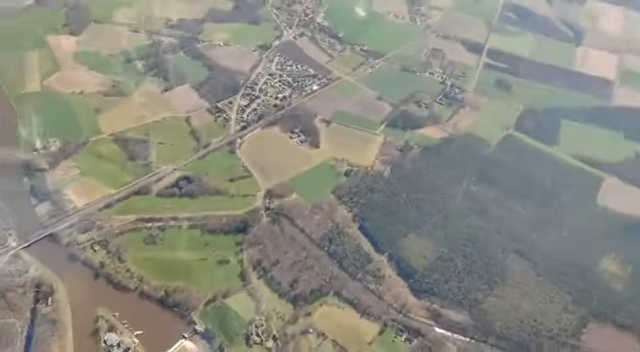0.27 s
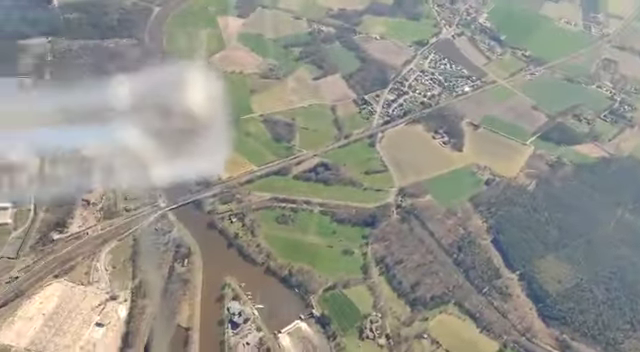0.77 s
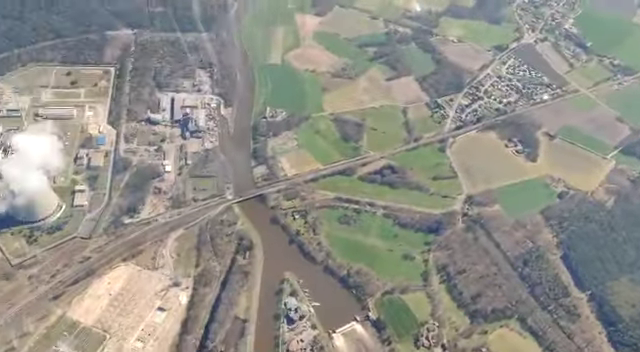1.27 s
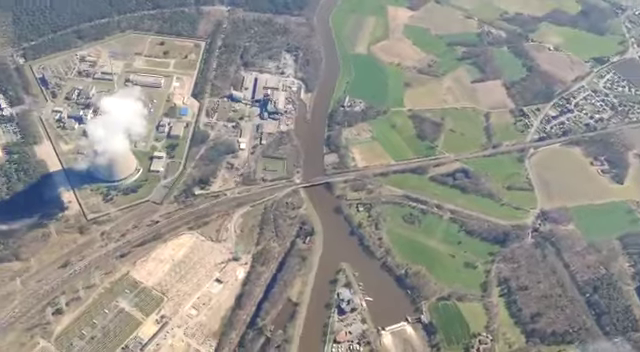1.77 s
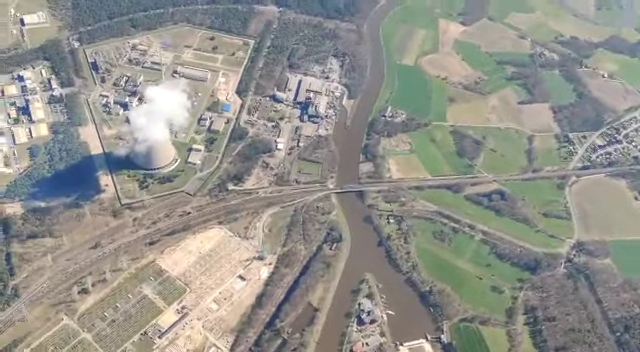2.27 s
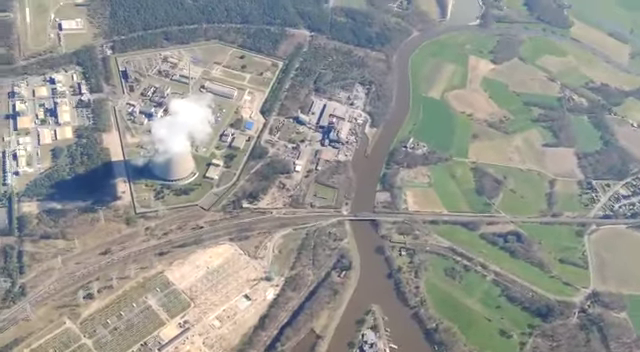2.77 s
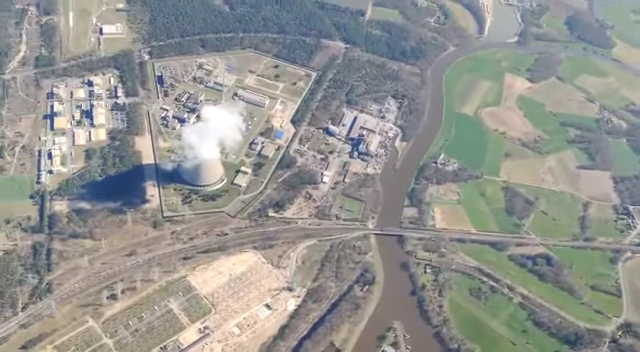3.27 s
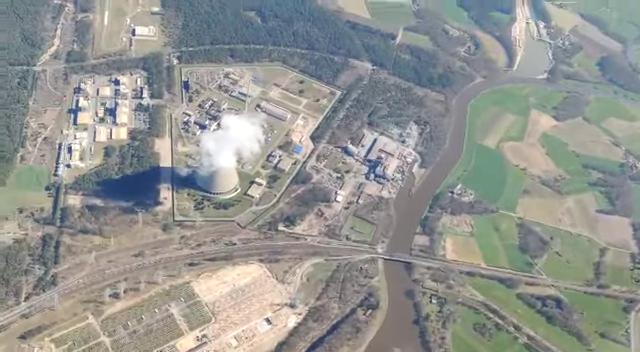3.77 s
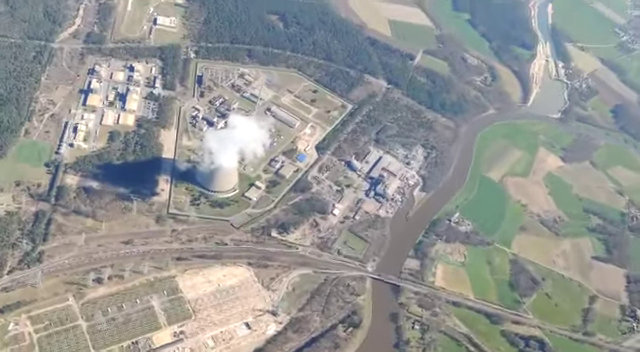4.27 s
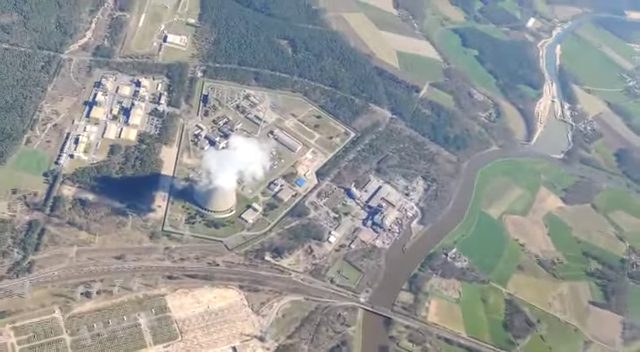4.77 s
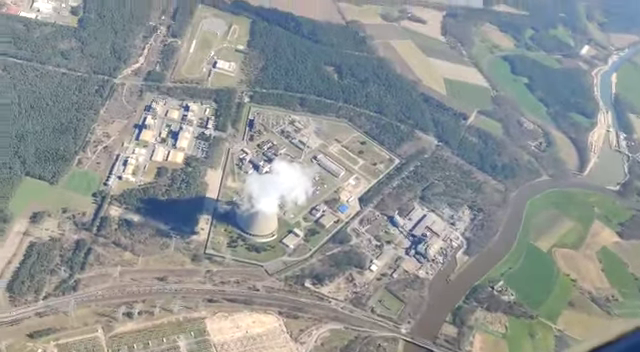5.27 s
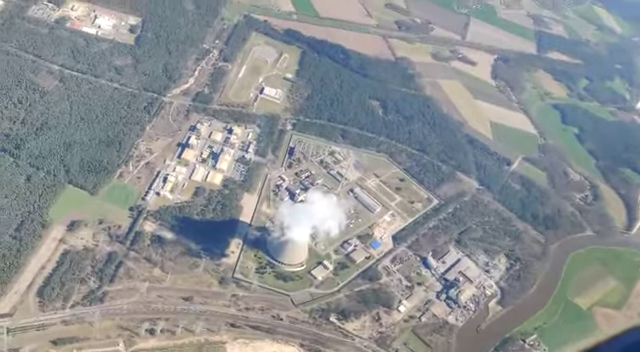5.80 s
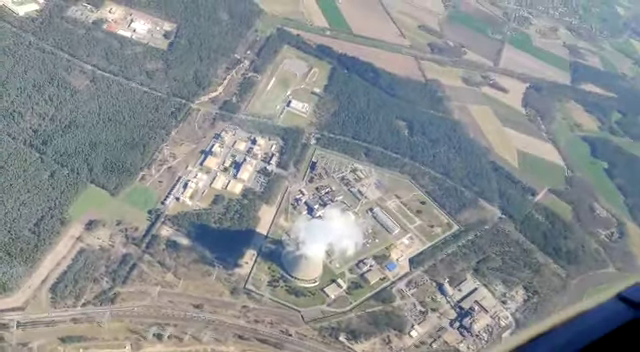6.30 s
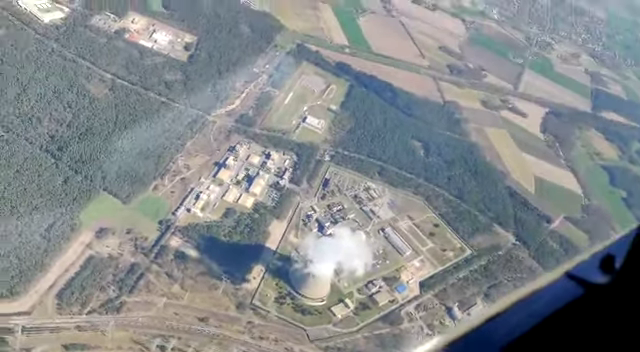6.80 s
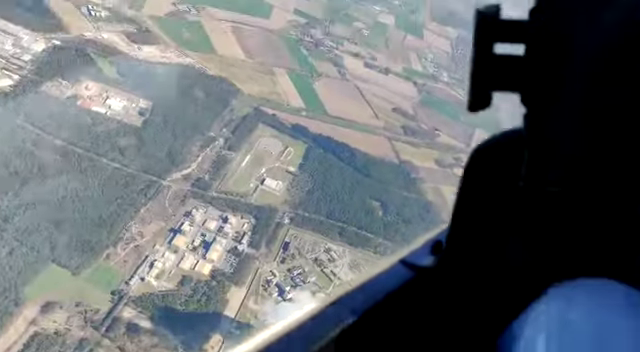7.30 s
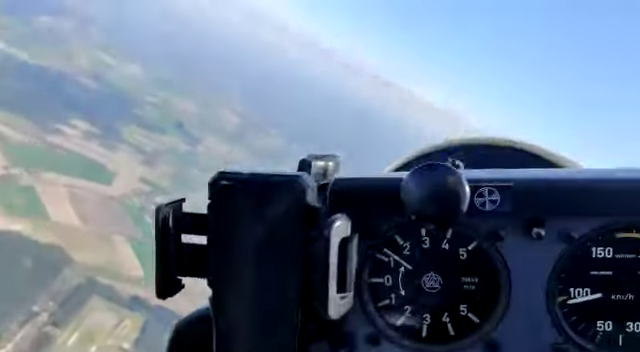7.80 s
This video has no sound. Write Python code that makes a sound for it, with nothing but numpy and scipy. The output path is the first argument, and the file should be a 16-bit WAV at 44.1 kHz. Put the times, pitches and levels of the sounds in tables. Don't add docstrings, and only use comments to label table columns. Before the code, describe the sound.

Inside the closed cockpit of a sailplane in flight, deep air roar fills the cabin without a break. Low boom and shell shudder flutter irregularly, with duller drumming and a soft wide hiss from the canopy and vent. The shudder is roughest near the third second, the hiss peaks soon after, then jolts crowd the second half and a last gust swells at the end. A handheld stereo microphone is close to overload, its limiter squeezing the bass.

```python
import sys
import numpy as np
from scipy import signal
from scipy.fft import rfft, irfft
from scipy.io import wavfile
from scipy.ndimage import uniform_filter1d

SR = 44100
rng = np.random.default_rng(int(sys.argv[2]) if len(sys.argv) > 2 else 0)


def persist_wave(psi):
    counts = np.round(np.clip(psi, -1, 1) * 32767).astype(np.int16)
    wavfile.write(sys.argv[1], SR, np.atleast_2d(counts).T)


def volts(x):
    e = np.asarray(x, float) / 20
    return 10 ** e


N = 355005
SECONDS = np.arange(N) / SR

BOOM_FROM_HZ, CANOPY_FROM_HZ, VENT_FROM_HZ = 80, 280, 850


def rms_one(x):
    return x / np.sqrt(np.mean(np.abs(x) ** 2) + 1e-20)


def in_time(rows):
    s, *columns = np.transpose(rows)
    return [np.interp(SECONDS, s, column) for column in columns]


def drift(rate):
    r = np.exp(-80 * np.pi * rate / SR)
    noise = rng.standard_normal(N // 40 + 2002)
    slow = signal.lfilter([1], [1, -2 * r, r * r], noise)[2000:]
    return np.interp(np.arange(N) / 40, np.arange(len(slow)), rms_one(slow))


def swells(rows, width_s):
    s, *columns = np.transpose(rows)
    t = np.arange(0, N + 64, 64) / SR
    bells = np.exp(-.5 * ((t - s[:, None]) / width_s) ** 2)
    return [np.interp(SECONDS, t, column @ bells) for column in columns]


# time in seconds, flow over the canopy as hiss in dB, sideslip as drumming in dB.
AIRSTREAM = [(0.0, -40.5, -26.5), (0.36, -41.5, -26), (0.61, -41.5, -24.5), (1.19, -39.5, -24.5),
             (2.96, -40.5, -30), (3.38, -38.5, -29), (3.54, -36.5, -30.5), (3.79, -37, -35),
             (4.37, -42, -31.5), (5.25, -39.5, -26), (5.63, -39, -28), (6.08, -38.5, -25.5),
             (6.61, -40, -28), (6.77, -40, -29.5), (7.73, -40.5, -31), (8.05, -43.5, -33)]
# time in seconds, shudder of the shell in dB.
ROUGH_AIR = [
    (0.0, -21),
    (1.66, -24),
    (2.53, -15),
    (3.36, -19),
    (3.59, -18.5),
    (5.43, -19),
    (5.81, -19.5),
    (6.28, -16.5),
    (8.05, -20.5),
]
# centre in seconds, hiss in dB, drumming in dB.
BRIEF_RISES = [(0.299, 3.5, 2), (0.369, -2.9, -2.5), (0.928, -1.5, -1), (1.107, 1.3, 2.5), (1.242, 3.5, 2.6),
               (2.05, -1.5, -2.5), (2.16, 1, 4.8), (3.307, -2, -4), (3.542, 0.5, 3), (3.956, 2, 5.5),
               (4.146, 2, 4), (4.375, -1.5, -1), (4.629, 1, 4), (4.734, 1, 3.4), (5.029, 1, 2), (5.283, 1.5, 2),
               (5.567, -3, -3), (5.657, 0.9, 3.5), (5.757, -2.5, -4), (6.091, 0.5, 4), (6.226, -3.5, -4.5),
               (6.43, 3, 6.5), (6.765, -4, -4.1), (6.924, -2, -1.5), (7.174, 3, 4.5), (7.593, -0.5, -1),
               (7.807, 5, 2.5), (7.937, 6, 8.5)]
# centre in seconds, boom in dB.
SURGES = [(0.509, -2.5), (1.048, 2.5), (1.182, -3.5), (1.691, -7.5), (1.746, 3), (1.891, 2.5), (2.035, 3),
          (2.1, -2.5), (2.305, -5), (2.405, -8), (2.908, -3), (3.198, 0.5), (3.422, -5.5), (3.557, 6),
          (3.657, 4), (3.781, -4), (3.941, -5.5), (4.096, -6), (5.907, -7), (6.161, -3), (6.351, -4.5),
          (6.52, -0.5), (7.628, -2), (7.722, -7.5)]
# centre in seconds, shudder in dB.
JOLTS = [(1.287, 6), (1.447, -2.5), (1.591, 9.5), (1.716, -2), (2.095, -1), (2.385, -1.5), (4.2, 4),
         (4.744, -6), (5.238, 3.5), (5.378, -4), (5.512, 6.5), (5.612, -8.5), (5.682, 6.5), (5.777, -9),
         (5.981, -7.5), (6.271, 6.5), (6.934, -6.5), (7.144, -3)]
MEAN_FLOW_DB, MEAN_SLIP_DB = -40, -29


def airstream():
    flow_db, slip_db = in_time(AIRSTREAM)
    brief_hiss_db, thud_db = swells(BRIEF_RISES, width_s=0.032)
    shudder_db = in_time(ROUGH_AIR)[0] + swells(JOLTS, width_s=0.041)[0]
    boom_db = 4.5 + 0.43 * SECONDS - 0.69 * (flow_db - MEAN_FLOW_DB)
    boom_db += swells(SURGES, width_s=0.021)[0]
    return shudder_db, boom_db, slip_db + thud_db, flow_db, flow_db + brief_hiss_db


# frequency in Hz, density in dB per Hz.
HISS_LEFT = [(250, -4.5), (500, 2), (800, 4), (1200, 0), (1750, 1.5), (2500, -4), (4200, -2.5),
             (4750, -0.5), (5200, -9.5), (5900, -15), (8000, -21), (11000, -24.5), (14100, -29.5),
             (15300, -51)]
# frequency in Hz, density in dB per Hz.
HISS_RIGHT = [(250, 2), (500, 1.5), (1000, -1.5), (1700, -1), (2500, -6.5), (3300, -3.5), (4300, -8.5),
              (5500, -7.5), (7500, -14.5), (9000, -18), (11200, -23.5), (13500, -22), (15800, -21.5)]


def hiss():
    *_, flow_db, level_db = airstream()
    shared_part, lag = .22, 18
    own, shared = rng.standard_normal((2, N)), rng.standard_normal(N)
    both_ports = np.array([shared, np.roll(shared, lag)])
    white = np.sqrt(1 - shared_part) * own + np.sqrt(shared_part) * both_ports

    log_hz = np.log(np.arange(N // 2 + 1) * SR / N + 1)
    colour_db = []
    for rows in (HISS_LEFT, HISS_RIGHT):
        hz, db = np.transpose(rows)
        colour_db.append(np.interp(log_hz, np.log(hz), db, left=-60))
    body = rms_one(irfft(rfft(white) * volts(np.array(colour_db)), N))

    fine = signal.sosfiltfilt(signal.butter(2, 8000, "high", fs=SR, output="sos"), body)
    fine_db = 0.85 - 0.22 * SECONDS + .3 * (flow_db - MEAN_FLOW_DB) + .7 * drift(4.6)
    flutter_db = 1.02 * drift(22.0)
    return volts(level_db + 5.5 + flutter_db) * (body + (volts(fine_db) - 1) * fine)


# frequency in Hz, width
# in Hz, level in dB rms, left-right difference in dB, left lead in radians.
COCKPIT_MODES = [(28, 28, -20.5, -1.6, .06), (50, 12, -22.5, -3.2, .11), (71, 14, -26.5, -4, .4),
                 (87, 16, -25, 2.5, .3), (102, 18, -19.5, 1.5, .14), (118, 16, -20, 0, .15),
                 (133, 12, -14.5, -1.5, .2), (150, 14, -19, -2.3, .46), (169, 20, -18.5, -2.7, .55),
                 (200, 26, -23, .8, 1.1), (228, 22, -24, 4, .85), (262, 15, -35, -2.7, .2),
                 (295, 30, -35, -2, 1.), (325, 26, -35.5, -.5, 1.8), (372, 24, -35, 10, 1.5),
                (398, 24, -35, 2, .6), (440, 30, -40.5, 9, 2.), (476, 35, -35, 4.6, .3),
                (545, 55, -38, -1, .3), (620, 70, -41, 2, -1.1), (710, 80, -41, 5, .2),
                (765, 50, -48, 0, 0), (890, 130, -44.5, 0, 2.9), (1130, 140, -45, 3.6, 3.05),
                (1300, 110, -45, 5, 3.), (1480, 160, -48, 3, 3.1)]
# time in seconds, tilt in dB per octave.
SPEED_TILT = [
    (0, -2),
    (1.2, 0),
    (2.2, -4.5),
    (2.8, 4.5),
    (3.7, 1.5),
    (4.6, 4.5),
    (5.5, -0.8),
    (6.5, 1),
    (7.3, 3),
    (8.05, 0.1),
]
COARSE = 8


def ring(hz, width):
    count = N // COARSE + 1
    pole = np.exp((-1.3 * np.pi * width + 2j * np.pi * hz) * COARSE / SR)
    noise = rng.standard_normal((3, count + 1000))
    swing = signal.lfilter([1], [1, -2 * pole, pole ** 2], noise)[:, 1000:]
    pitch = (hz / 300) ** 2
    own = .3 * pitch / (1 + pitch)
    return rms_one(np.sqrt(1 - own) * swing[0] + np.sqrt(own) * swing[1:])


def cabin():
    layers = np.zeros((4, 2, N // COARSE + 1))
    tilt = in_time(SPEED_TILT)[0][::COARSE]
    slip_db = in_time(AIRSTREAM)[1][::COARSE] - MEAN_SLIP_DB
    half = np.array([[.5], [-.5]])
    for hz, width, level_db, pan_db, lead in COCKPIT_MODES:
        ports = volts(half * pan_db) * np.exp(1j * half * lead)
        swell_db = 0.64 * drift(3.2)[::COARSE]
        if BOOM_FROM_HZ < hz < 190:
            swell_db += tilt * np.log2(hz / 133)
        if 190 < hz < 240:
            swell_db += 0.41 * slip_db
        if 280 < hz < 350:
            swell_db -= .45 * slip_db
        layer = int(hz > BOOM_FROM_HZ) + int(hz > CANOPY_FROM_HZ) + int(hz > VENT_FROM_HZ)
        layers[layer] += volts(level_db - 1.5 + swell_db) * np.real(ports * ring(hz, width))

    shudder, boom, drum, vent = signal.resample_poly(layers, COARSE, 1, axis=-1)[..., :N]
    shudder_db, boom_db, drumming_db, _, rush_db = airstream()
    low = volts(shudder_db + 26.0) * shudder + volts(boom_db) * boom
    return low + volts(drumming_db + 32.5) * drum + volts(rush_db + 44.0) * vent


def scene():
    return hiss() + cabin()


def limit(dry):
    ceiling_db, release_db_per_s, attack_s, duck_share = -1.3, 60, .003, .4
    over_db = np.maximum(20 * np.log10(np.abs(dry).max(axis=0) + 1e-9) - ceiling_db, 0)
    slope = release_db_per_s * SECONDS
    held_db = np.maximum.accumulate(over_db + slope) - slope
    ahead = round(attack_s * SR)
    cut_db = uniform_filter1d(held_db, size=2 * ahead + 1, origin=-ahead)
    bass = signal.sosfiltfilt(signal.butter(2, CANOPY_FROM_HZ, fs=SR, output="sos"), dry)
    return bass * volts(-cut_db) + (dry - bass) * volts(-duck_share * cut_db)


def round_peaks(x):
    knee, top = .7, .92
    above = np.maximum(np.abs(x) - knee, 0)
    bent = (top - knee) * np.tanh(above / (top - knee))
    return np.sign(x) * (np.minimum(np.abs(x), knee) + bent)


def starve(x):
    hz, s, cells = signal.stft(x, SR, nperseg=1024, noverlap=768)
    hz = hz[:, None]
    noise = rng.standard_normal(cells.shape[1:])
    chance = rms_one(uniform_filter1d(uniform_filter1d(noise, size=5, axis=0), size=8, axis=1))
    centre_hz = np.array([[[11500]], [[10700]]])
    depth = chance - .55 - ((hz - centre_hz) / 2600) ** 2
    waver = np.interp(s, SECONDS, drift(5))
    left_edge_hz = 14200 + 175 * waver
    right_edge_hz = np.where(s > 6.25, 15400 + 350 * waver, SR)
    kept = (depth < 0) & (hz < np.array([left_edge_hz, right_edge_hz])[:, None])
    return signal.istft(cells * kept, SR, nperseg=1024, noverlap=768)[1][:, :N]


def roll_off(x):
    return signal.sosfilt(signal.butter(12, 15760, fs=SR, output="sos"), x)


def record(dry):
    finished = starve(round_peaks(limit(dry)))
    return roll_off(finished)


dry = scene()
out = record(dry)
persist_wave(out)
```